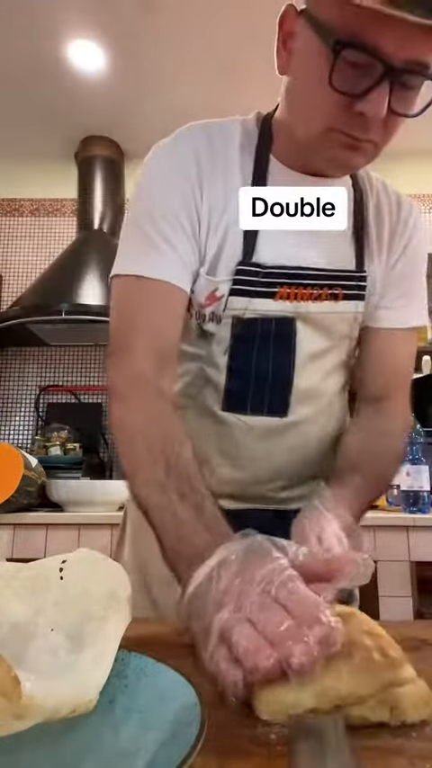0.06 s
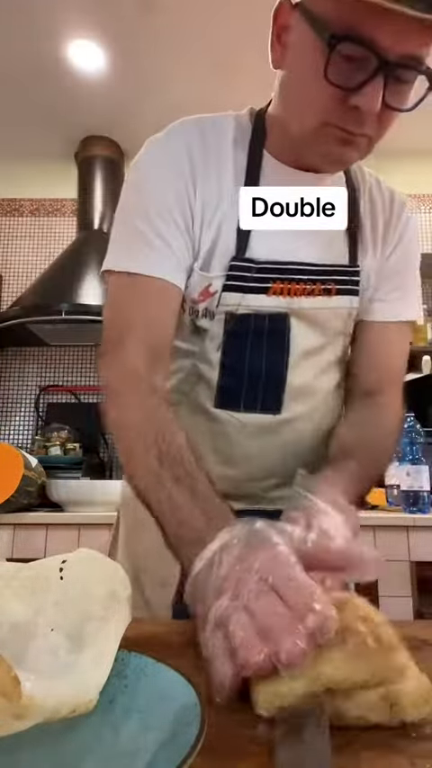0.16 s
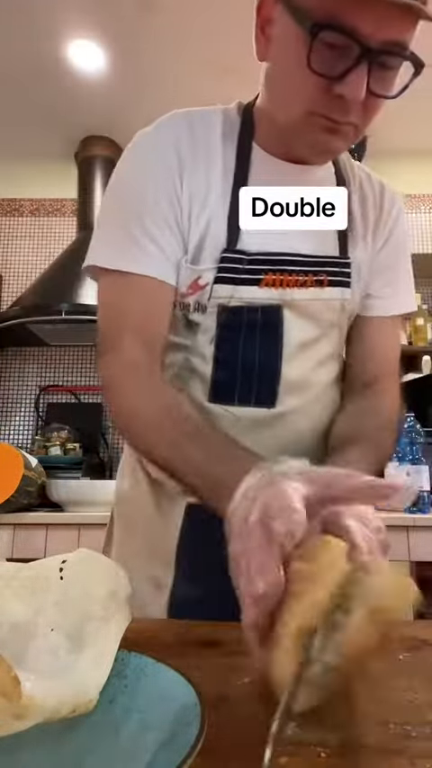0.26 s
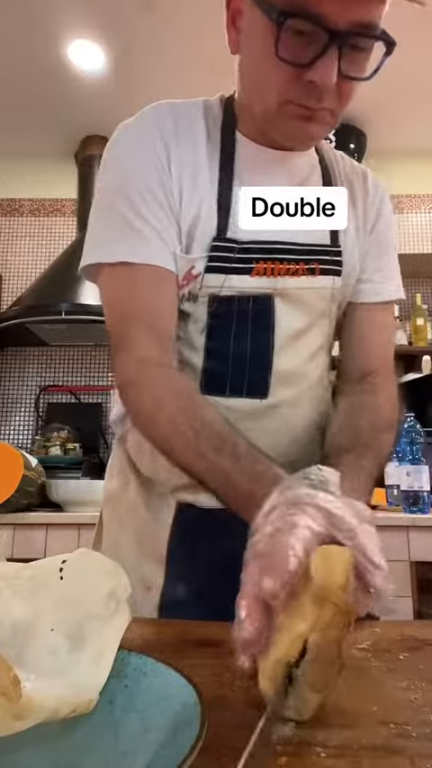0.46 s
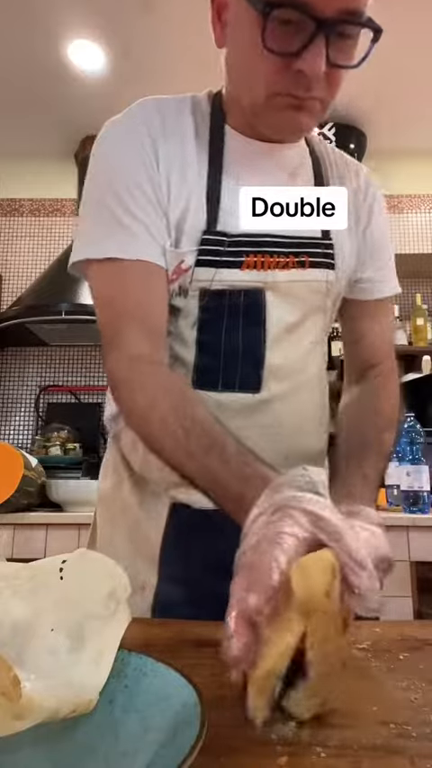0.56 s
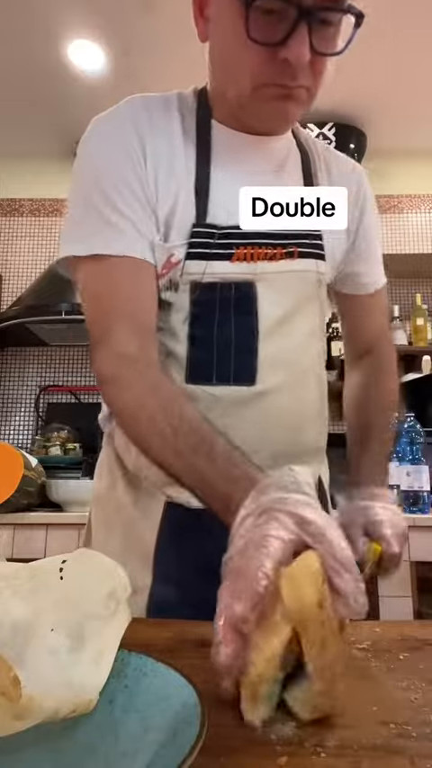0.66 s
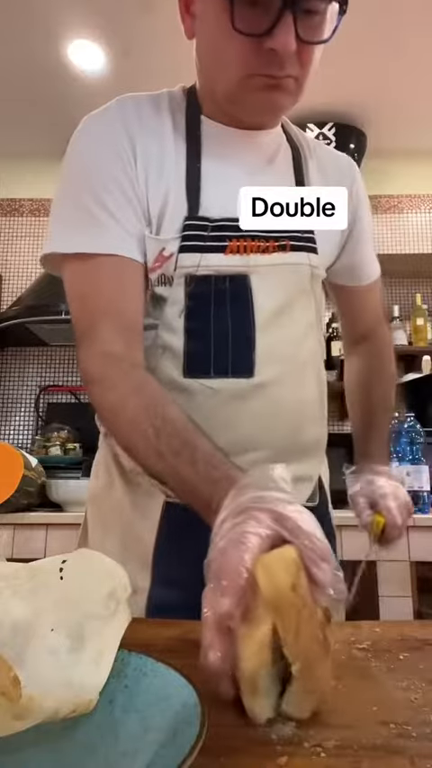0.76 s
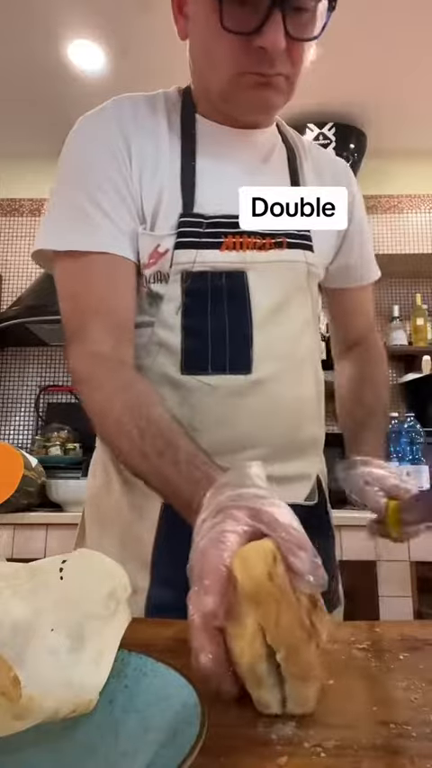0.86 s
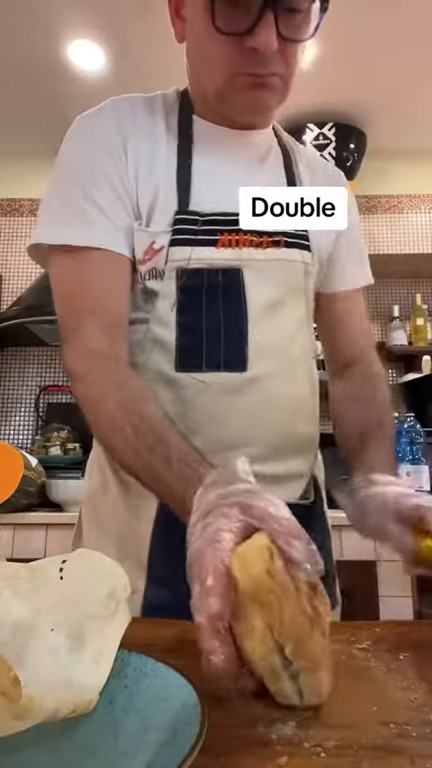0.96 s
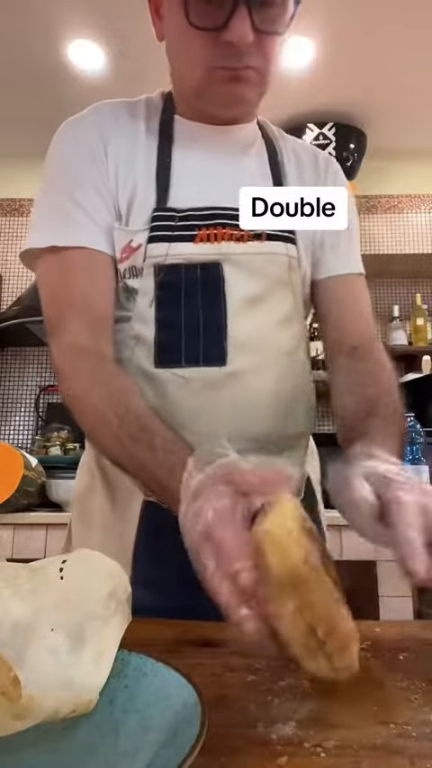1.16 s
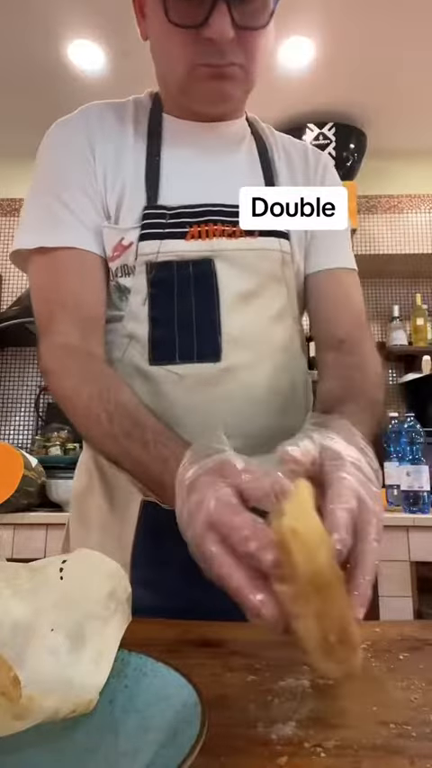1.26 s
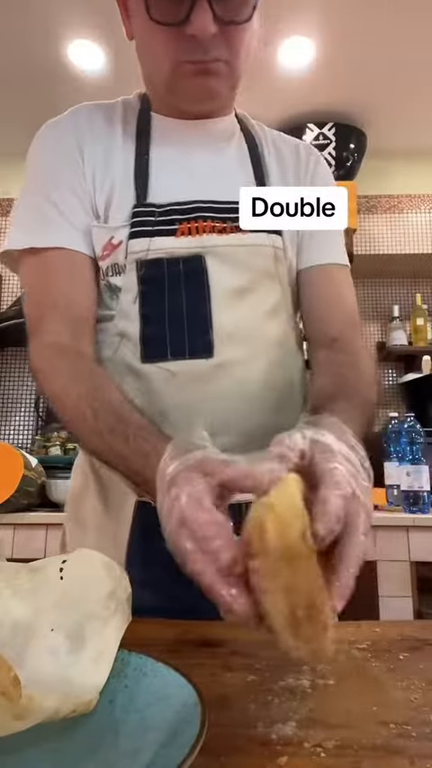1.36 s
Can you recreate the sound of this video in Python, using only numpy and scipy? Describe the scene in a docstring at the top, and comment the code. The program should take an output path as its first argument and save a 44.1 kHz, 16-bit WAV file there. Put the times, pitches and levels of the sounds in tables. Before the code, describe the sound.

Close up in a kitchen, bread crust cracks and crunches under a knife while plastic gloves crinkle and the table bumps. The knife then lands on the wooden board with a sharp clatter, and the gloves rustle faintly.

```python
"""A kitchen, a phone microphone close to a crusty loaf on a wooden board. From the start, thin plastic gloves
rustle on the bread and the table thuds under the hands. After two light knocks on the board, the knife crunches
through the crust, from about 0.2 to 0.6 s. Near 0.9 s it is put down: the handle knocks the board and the blade
clatters several times as it settles. The gloves and the table are heard again at the end, with one last small
snap of crust."""
import sys
import numpy as np
from scipy import signal
from scipy.fft import rfft, irfft, next_fast_len
from scipy.io import wavfile
from scipy.ndimage import uniform_filter1d, minimum_filter1d

SR = 44100
rng = np.random.default_rng(int(sys.argv[2]) if len(sys.argv) > 2 else 0)


def transcribe(signal):
    """Save signal, clipped to [-1, 1], as a 16-bit WAV file at the path in sys.argv[1]."""
    frames = np.atleast_2d(signal).T
    limited = np.clip(frames, -1, 1)
    pcm = np.round(limited * 32767).astype(np.int16)
    wavfile.write(sys.argv[1], SR, pcm)


N = 61739
TIME_S = np.arange(N) / SR


def amp(db):
    return 10 ** (np.asarray(db) / 20)


def unit_rms(x):
    return x / np.sqrt(np.mean(x ** 2) + 1e-20)


def along(points, hz):
    """Read (frequency_hz, value) points on a log frequency axis."""
    point_hz, values = np.transpose(points)
    return np.interp(np.log(hz + 1), np.log(point_hz + 1), values)


def level(points):
    """Gain per sample from (time_s, level_db) points, fading quickly outside them."""
    time_s, level_db = np.transpose(points)
    outside_s = np.abs(TIME_S - np.clip(TIME_S, time_s[0], time_s[-1]))
    return amp(np.interp(TIME_S, time_s, level_db) - 600 * outside_s)


def filtered(x, response):
    """Apply a complex frequency response."""
    size = next_fast_len(N + SR // 2)
    return irfft(rfft(x, size) * response(np.fft.rfftfreq(size, 1 / SR)), size)[:N]


def coloured(x, spectrum):
    """Minimum-phase filter shaped by (frequency_hz, gain_db) points."""
    size = 8192
    cepstrum = irfft(np.log(amp(along(spectrum, np.fft.rfftfreq(size, 1 / SR)))))
    cepstrum[1:size // 2] *= 2
    cepstrum[size // 2 + 1:] = 0
    return signal.fftconvolve(x, irfft(np.exp(rfft(cepstrum))))[:N]


def resonant(x, peaks):
    """Parallel resonances (pitch_hz, width_hz, gain_db) of alternating sign."""
    def response(hz):
        return sum((-1) ** k * amp(db) * 1j * hz * width / (pitch ** 2 - hz ** 2 + 1j * hz * width)
                   for k, (pitch, width, db) in enumerate(peaks))
    return filtered(x, response)


def grains(per_s, spread_db):
    """Tiny clicks at random moments, uneven in size."""
    sizes = amp(spread_db * np.clip(rng.standard_normal(N), -2, 2))
    signs = np.sign(rng.standard_normal(N))
    return sizes * signs * (rng.random(N) < per_s / SR)


def since(start_s):
    return np.maximum(TIME_S - start_s, 0)


def decay(start_s, t60_s):
    return (TIME_S >= start_s) * amp(-60 * since(start_s) / t60_s)


def swell(start_s, attack_s):
    return 1 - np.exp(-since(start_s) / attack_s)


def damped_sine(start_s, pitch_hz, t60_s):
    return decay(start_s, t60_s) * np.sin(2 * np.pi * pitch_hz * since(start_s))


def contact(start_s, t60_s, body):
    """A dying burst of micro-contacts heard through a body, starting at rms 1."""
    chatter = np.sign(rng.standard_normal(N))
    return body(chatter * decay(start_s, t60_s)) / np.std(body(chatter))


# Gloved hands on the loaf: time_s, level_db
GLOVE_LEVELS = [(0, -27.5), (.1, -33), (.19, -33), (.4, -24.5), (.6, -48.5), (.68, -43), (.75, -38),
                (.87, -39), (.98, -51.5), (1.07, -62.5), (1.13, -54.5), (1.21, -51), (1.27, -45),
                (1.33, -39.5), (1.4, -47)]
# Colour of the plastic: frequency_hz, gain_db
GLOVE_SPECTRUM = [(100, -1), (250, -3), (600, 2), (1200, -4), (2400, -0.5), (4000, -3), (6200, -5.5),
                  (6900, -12), (8800, -22.5), (9800, -32.5), (10600, -72)]
def gloves():
    """Thin plastic crinkles against the crust."""
    crinkles = grains(per_s=4300, spread_db=1)
    return level(GLOVE_LEVELS) * unit_rms(coloured(crinkles, GLOVE_SPECTRUM))


# Rumble of the table: time_s, level_db
RUMBLE_LEVELS = [(0, -36), (.13, -38.5), (.28, -26.5), (.52, -36), (.59, -43), (.72, -39), (.87, -36),
                 (.98, -36), (1.08, -72), (1.2, -58.5), (1.28, -45.5), (1.4, -45.5)]
# Colour of the rumble: frequency_hz, gain_db
RUMBLE_SPECTRUM = [(20, -22.5), (40, -10.5), (62, 4), (90, -1), (200, -3.5), (300, -6.5), (700, -63.5)]
# Weight landing on the table: start_s, level_db
TABLE_THUDS = [(0.211, -28), (.29, -25), (.362, -22.5), (.487, -21), (.626, -20.5), (0.907, -16)]
def table():
    """The table rumbles under the hands and thuds when weight lands on it."""
    out = level(RUMBLE_LEVELS) * unit_rms(coloured(rng.standard_normal(N), RUMBLE_SPECTRUM))
    for start_s, level_db in TABLE_THUDS:
        thud = damped_sine(start_s, pitch_hz=55.6, t60_s=0.24)
        out += amp(level_db) * thud * swell(start_s, attack_s=0.011)
    return out


# Modes of the wooden board: pitch_hz, level_db, t60_s
BOARD_MODES = [(339.5, -15, 0.069), (478.4, 1, 0.091), (632, -13, 0.11), (718, -7.5, 0.066),
               (918, -20, 0.22), (1014, -19.5, 0.085), (1382, -5, 0.056), (1815, -13.5, .06),
               (2404, -4, 0.029), (2740, -17, 0.01), (3184, -11.5, .024), (3920, -13.5, 0.038),
               (4300, -21, 0.041), (5130, -14.5, 0.029)]
# Blows on the board: start_s, ring_db, crack_db, push_db
BOARD_KNOCKS = [(.001, -20.5, -28.5, -52), (0.2066, -17, -15, -18.5), (0.8946, 0, -0.5, -8.5),
                (0.9246, -10, -20.5, -16)]
# Colour of a blow's crack: frequency_hz, gain_db
KNOCK_SPECTRUM = [(100, 0.5), (400, -9.5), (1000, 7.5), (1600, 1.5), (3200, -5), (5200, -18), (7000, -20.5),
                  (9500, -31.5), (11000, -65.5)]
def board_knocks():
    """Each blow is a short crack, a dull push and the ring of the board, deadened by what lies on it."""
    mute_s = 0.089
    out = np.zeros(N)
    for start_s, ring_db, crack_db, push_db in BOARD_KNOCKS:
        ring = sum((-1) ** k * amp(level_db + rng.standard_normal()) * damped_sine(start_s, pitch_hz, t60_s)
                   for k, (pitch_hz, level_db, t60_s) in enumerate(BOARD_MODES))
        ring *= swell(start_s, attack_s=0.00075) * np.exp(-(since(start_s) / mute_s) ** 4)
        push = damped_sine(start_s, pitch_hz=144, t60_s=0.041)
        crack = contact(start_s, t60_s=0.034, body=lambda x: coloured(x, KNOCK_SPECTRUM))
        out += amp(ring_db) * ring + amp(push_db) * push + amp(crack_db) * crack
    return out


# Single pieces of crust breaking: start_s, crack_db, crack_t60_s, pitch_hz, ring_db
CRUST_SNAPS = [(.002, -25, 0.057, 966, -14), (0.06, -24, 0.035, 2500, -25), (0.2063, -20, .014, 1702, -16),
               (.275, -14, 0.04, 2717, -19), (0.318, -12.5, 0.037, 1985, -17),
               (.348, -22, 0.012, 957, -5.5), (.3585, -20.5, 0.014, 380, -8.5),
               (0.381, -15, 0.018, 1740, -12), (0.432, -11.5, 0.028, 2656, -14.5),
               (0.473, -5, 0.031, 1608, -5), (.485, -16.5, 0.019, 640, -1), (0.498, -18, 0.005, 906, -7),
               (.518, -7, 0.0059, 614, -4), (0.5251, -16, .008, 4020, -21), (0.537, -27, .025, 1702, -7.5),
               (.564, -16.5, .01, 2300, -22.5), (.586, -33.5, 0.013, 606, -16),
               (0.63, -30.5, 0.037, 1660, -34.5), (0.711, -34, .05, 1640, -39),
               (1.314, -30.5, 0.018, 5400, -35.5)]
# Colour of a snap: frequency_hz, gain_db
SNAP_SPECTRUM = [(200, -19.5), (700, 5), (1500, 0.5), (2500, 7), (3300, -4.5), (6000, -9.5), (8500, -26),
                 (9800, -33.5), (10700, -80)]
def crust_snaps():
    """Larger pieces of crust give way one at a time, each with a crack and a brief hollow ring."""
    out = np.zeros(N)
    for start_s, crack_db, crack_t60_s, pitch_hz, ring_db in CRUST_SNAPS:
        crack = contact(start_s, crack_t60_s, lambda x: coloured(x, SNAP_SPECTRUM))
        ring = damped_sine(start_s, pitch_hz, t60_s=0.052) * swell(start_s, attack_s=0.0019)
        out += amp(crack_db) * crack + amp(ring_db) * ring
    return out


# Force of the cut: time_s, gain_db
CUT_FORCE = [(.235, -33), (.252, -27), (.284, -17), (.311, -26), (.322, -28.5), (.337, -24.5), (.351, -10),
             (.392, -12), (.412, -13.5), (.436, -6.5), (.486, -8), (.52, -10.5), (.53, -14.5), (.55, -10),
             (.578, -26.5), (.62, -36.5), (.645, -47.5), (.69, -40.5)]
# Colour of the crunch: frequency_hz, gain_db
CRUST_SPECTRUM = [(100, -28.5), (280, -16.5), (400, -4.5), (900, -3), (1130, -5.5), (1600, -0.5),
                  (2700, -5), (3200, -25.5), (5000, -17.5), (7000, -46.5), (9500, -55.5), (11000, -96.5)]
# Resonances the blade drives in turn: peak_s, span_s, pitch_hz, width_hz, gain_db
CUT_RESONANCES = [(.275, 0.036, 676, 60, -5.5), (0.376, 0.021, 377, 18, -3.5),
                  (0.378, 0.043, 481, 20, -10.5), (0.388, 0.046, 919, 120, -6),
                  (0.502, 0.022, 880, 110, -7), (0.501, 0.014, 635, 66, -3), (.62, .06, 623, 58, -0.5),
                  (.47, 0.043, 1346, 51, -9.5), (.52, 0.13, 1620, 130, -7.5), (.52, 0.06, 2050, 150, -8),
                  (0.471, 0.048, 2627, 200, -10.5), (.47, 0.063, 184.7, 19, -21)]
# Fine splintering of the crust: time_s, level_db
FLAKE_LEVELS = [(0.235, -31), (0.279, -25), (0.285, -37), (0.421, -18.5), (0.429, -14), (0.565, -38.5),
                (0.585, -44), (0.62, -44.5)]
# Colour of the flakes: frequency_hz, gain_db
FLAKE_SPECTRUM = [(800, -27.5), (2500, 3), (3300, -3), (4000, 2), (5000, -10), (6200, -4), (6900, -13.5),
                  (8500, -22.5), (9900, -41.5), (10700, -80)]
def knife_cut():
    """Crust cracks under the blade and drives resonances that change as it sinks; flakes splinter on top."""
    cracks_per_s, crunch_db = 1500, -3
    crunch = amp(crunch_db) * unit_rms(coloured(grains(cracks_per_s, spread_db=3), CRUST_SPECTRUM))
    for peak_s, span_s, pitch_hz, width_hz, gain_db in CUT_RESONANCES:
        band = [(pitch_hz, 1.48 * width_hz, 0)]  # two passes narrow it to about width_hz
        cracks = grains(cracks_per_s, spread_db=2.5)
        ring = unit_rms(resonant(resonant(cracks, band), band))
        crunch += amp(gain_db) * ring * np.exp(-0.5 * ((TIME_S - peak_s) / span_s) ** 2)
    flakes = unit_rms(coloured(grains(per_s=3000, spread_db=1), FLAKE_SPECTRUM))
    return level(CUT_FORCE) * crunch + level(FLAKE_LEVELS) * flakes


# Resonances of the blade: pitch_hz, width_hz, gain_db
BLADE_MODES = [(932, 240, -1), (1790, 200, -5), (2084, 300, -3), (2580, 310, 2), (2685, 300, -6),
               (4730, 1200, -20), (6300, 230, -20)]
def blade_body(x, top_hz=7500):
    """The flat blade resonates on the wood, with a steep fall in the high treble."""
    return filtered(resonant(x, BLADE_MODES), lambda hz: 1 / (1 + (hz / top_hz) ** 10))


# The blade landing on the board: start_s, tick_db, tick_hz, ring_db, t60_s
BLADE_BOUNCES = [(.895, 3, 3330, -22.5, .02), (0.9138, -19, 2580, -15.5, 0.052),
                 (0.9248, -4, 2400, -4, 0.029), (.931, -1.5, 2480, -13.5, 0.062),
                 (0.9565, 1, 2524, -27, 0.016), (0.987, -18.5, 1490, -36, 0.0243)]
def blade_clatter():
    """The blade slaps the wood and bounces to rest: a hard tick and a buzzing ring each time."""
    tick_rise_s = 0.00055
    out = np.zeros(N)
    for start_s, tick_db, tick_hz, ring_db, t60_s in BLADE_BOUNCES:
        age_s = since(start_s)
        burst = (age_s / tick_rise_s * np.exp(1 - age_s / tick_rise_s)) ** 2
        tick = burst * np.sin(2 * np.pi * tick_hz * age_s)
        out += amp(tick_db) * tick + amp(ring_db) * contact(start_s, t60_s, blade_body)
    return out


# Reverberation of the kitchen: frequency_hz, t60_s
KITCHEN_DECAY = [(150, .22), (500, 0.27), (1300, 0.43), (2500, 0.28), (4000, 0.24), (10000, 0.11)]
def kitchen(x):
    """The room returns a short tail whose treble dies first."""
    hz, time_s, noise = signal.stft(rng.standard_normal(SR // 2), SR, nperseg=256)
    fade = amp(-60 * time_s / along(KITCHEN_DECAY, hz)[:, None])
    tail = signal.istft(noise * fade, SR, nperseg=256)[1]
    return signal.fftconvolve(x, tail / np.linalg.norm(tail))[:N]


def scene():
    """Mono, close up: bread, board and blade with a little kitchen behind; gloves and table stay dry."""
    room_db, blade_send = -21.5, 0.66  # the blade is near the microphone, so it carries less room
    bread_and_board = knife_cut() + crust_snaps() + board_knocks()
    blade = blade_clatter()
    room = amp(room_db) * kitchen(bread_and_board + blade_send * blade)
    return (bread_and_board + blade + room + gloves() + table())[None]


def record(dry):
    """The phone: a fast limiter rounds the loudest peaks, what is still over clips, and the top is cut."""
    limit_db, limit_s, top_hz = 1.3, 0.00088, 16000
    span = int(limit_s * SR)
    needed_gain = np.minimum(1, amp(limit_db) / (np.abs(dry[0]) + 1e-9))
    limited = dry[0] * uniform_filter1d(minimum_filter1d(needed_gain, span), span)
    return filtered(np.clip(limited, -1, 1), lambda hz: hz < top_hz)[None]


dry = scene()
out = record(dry)
transcribe(out)
```